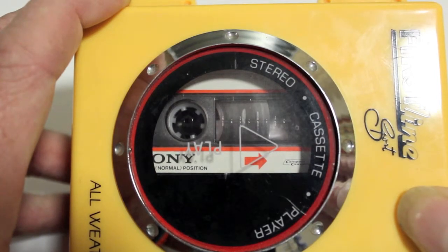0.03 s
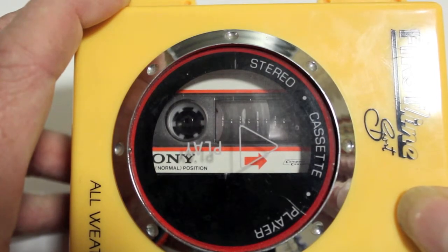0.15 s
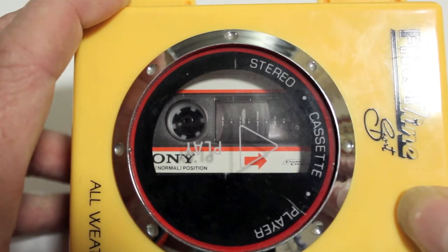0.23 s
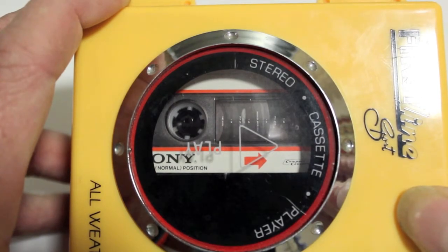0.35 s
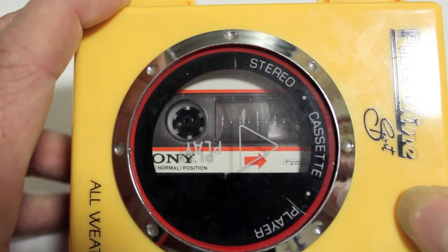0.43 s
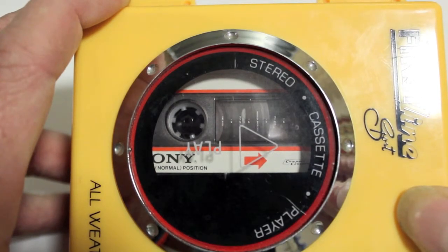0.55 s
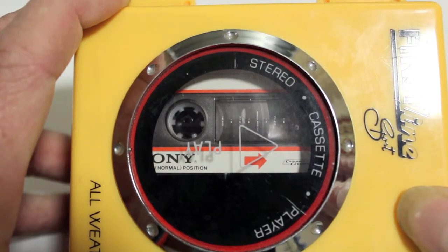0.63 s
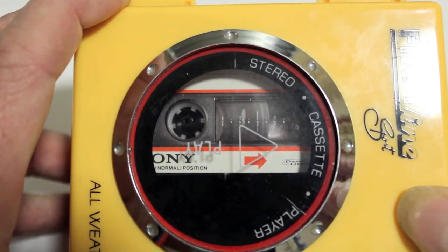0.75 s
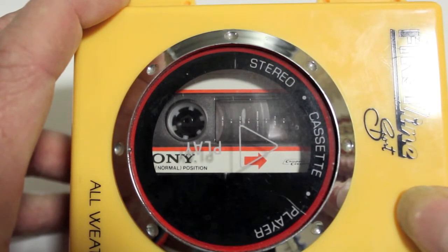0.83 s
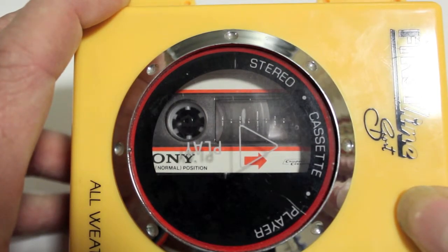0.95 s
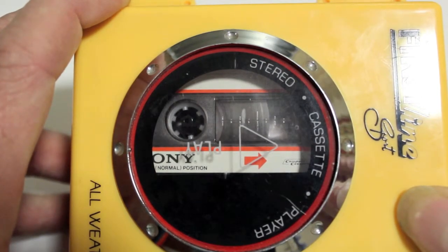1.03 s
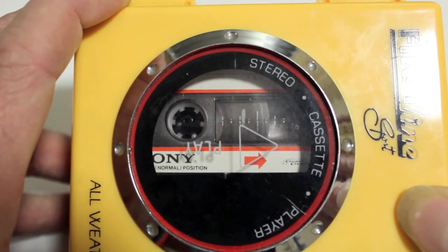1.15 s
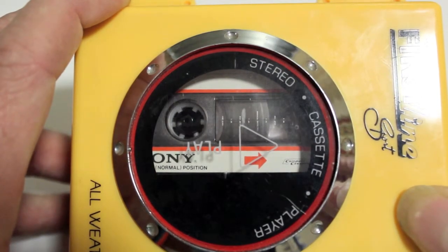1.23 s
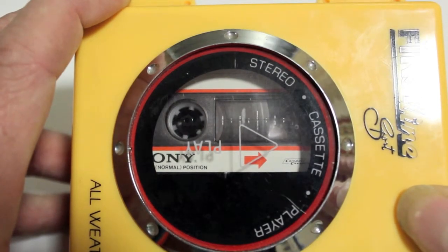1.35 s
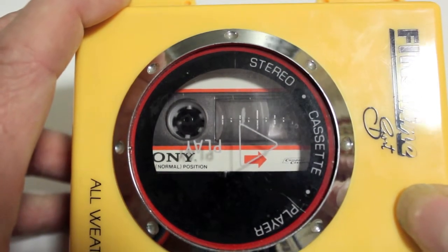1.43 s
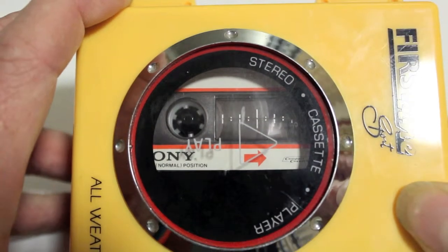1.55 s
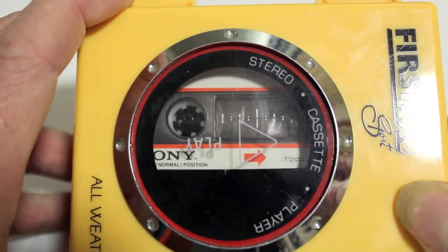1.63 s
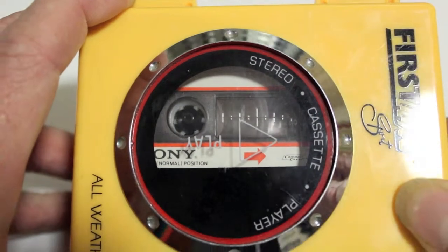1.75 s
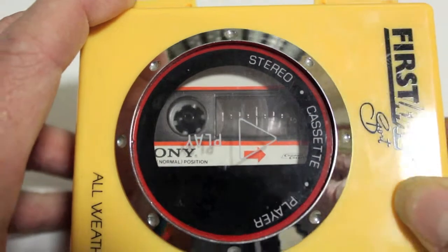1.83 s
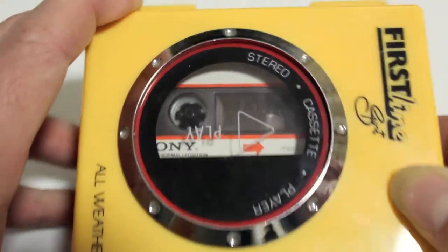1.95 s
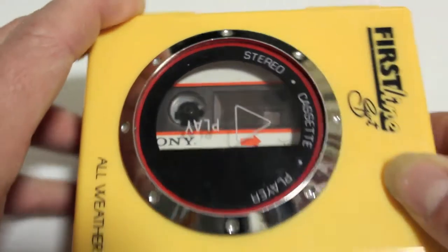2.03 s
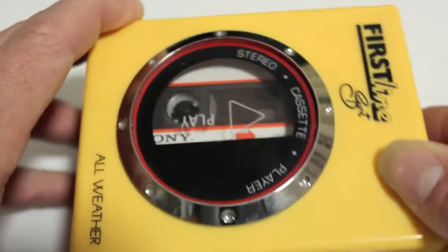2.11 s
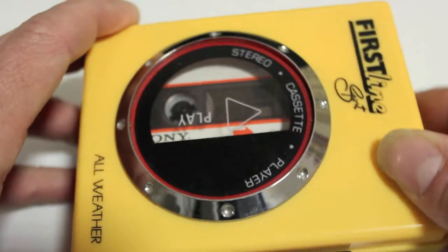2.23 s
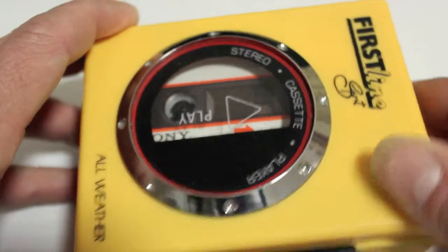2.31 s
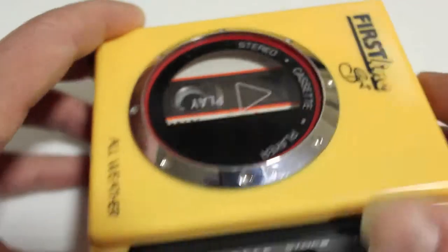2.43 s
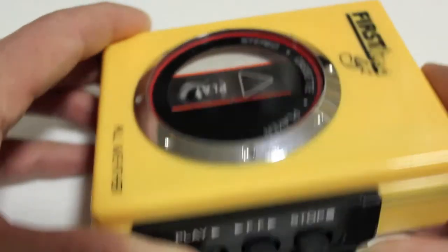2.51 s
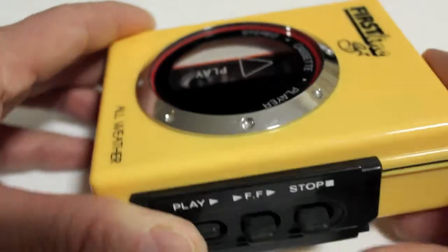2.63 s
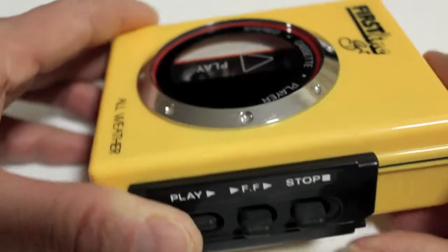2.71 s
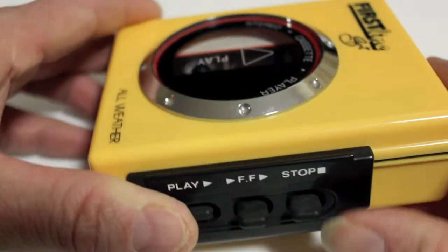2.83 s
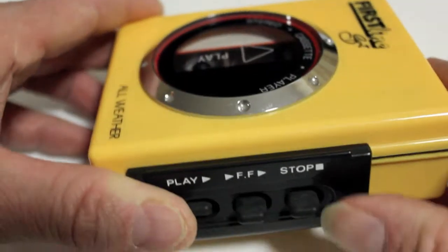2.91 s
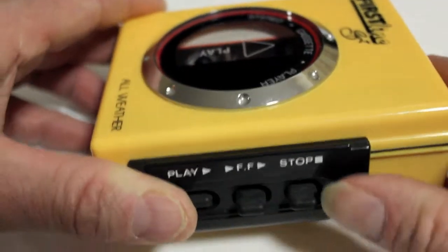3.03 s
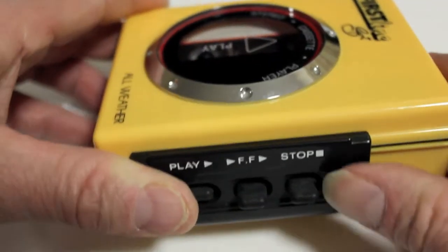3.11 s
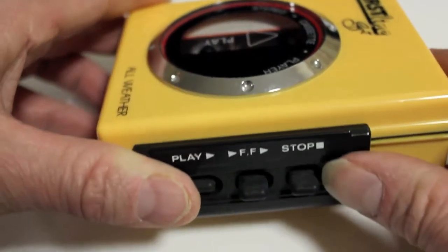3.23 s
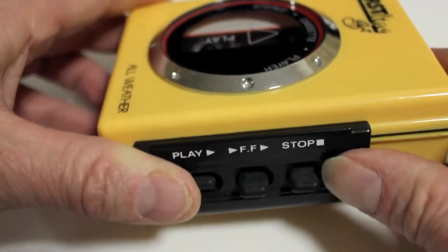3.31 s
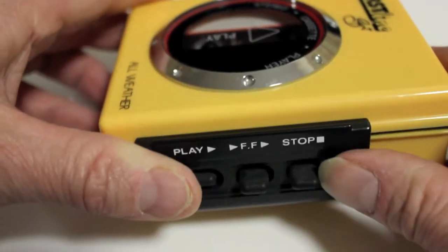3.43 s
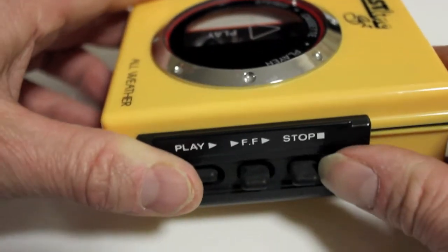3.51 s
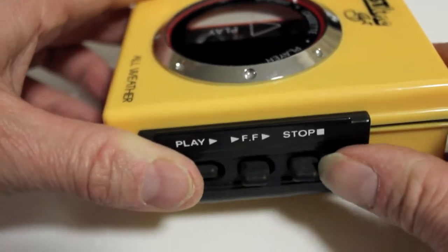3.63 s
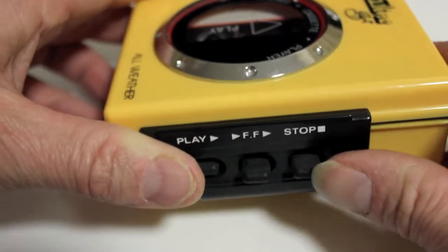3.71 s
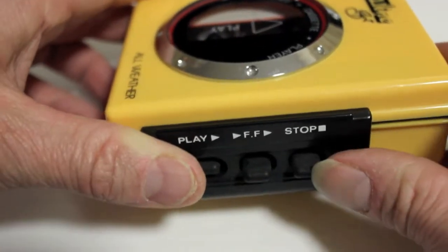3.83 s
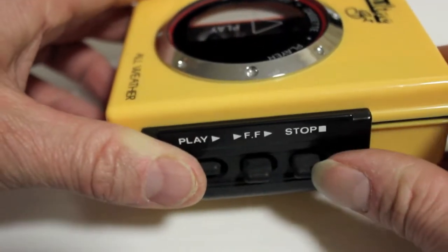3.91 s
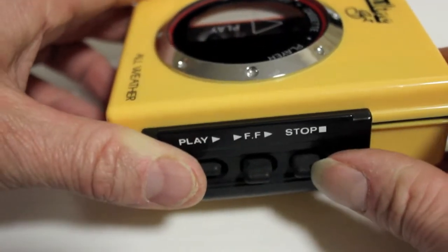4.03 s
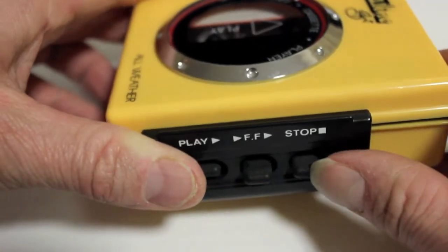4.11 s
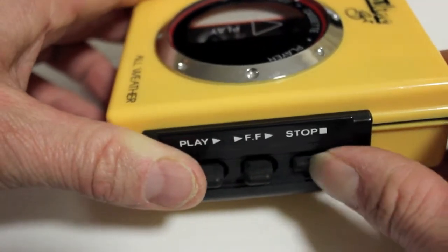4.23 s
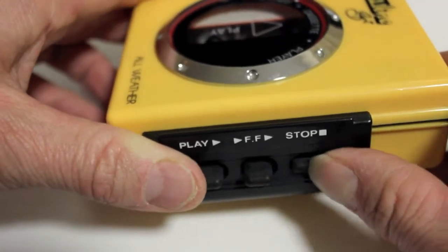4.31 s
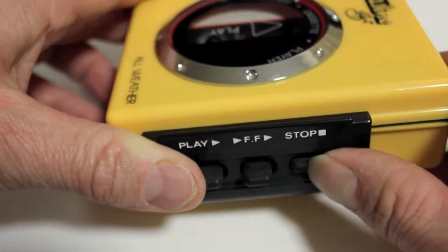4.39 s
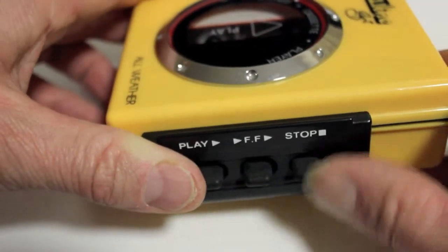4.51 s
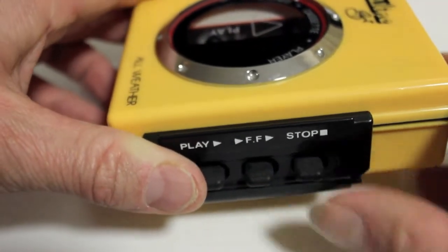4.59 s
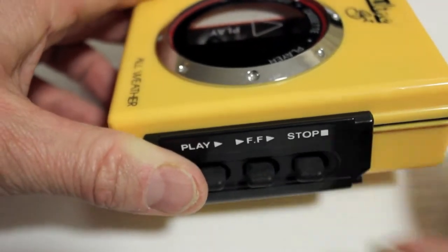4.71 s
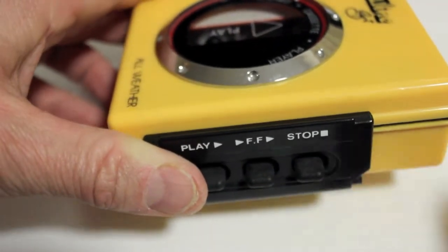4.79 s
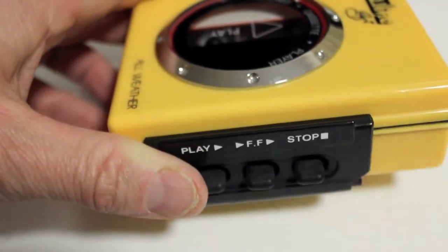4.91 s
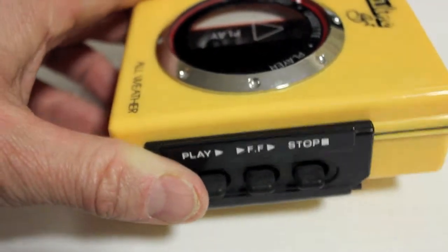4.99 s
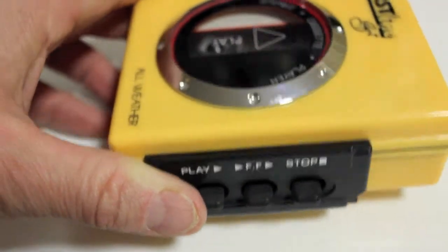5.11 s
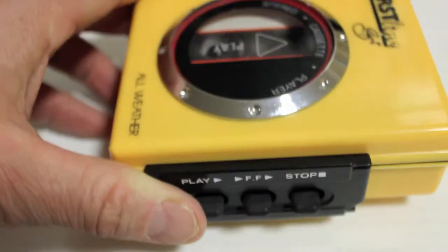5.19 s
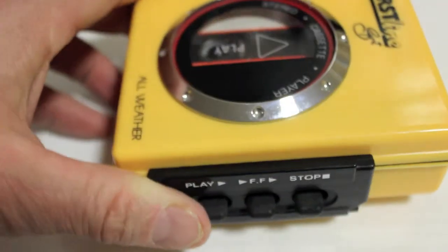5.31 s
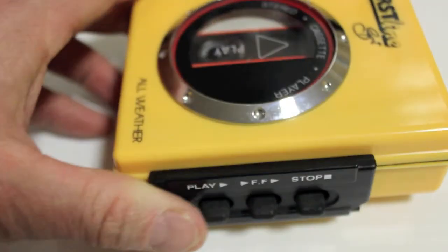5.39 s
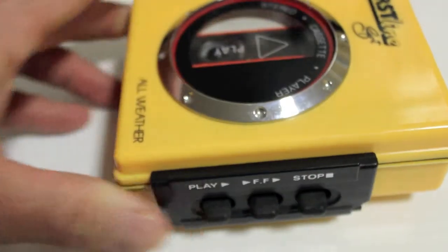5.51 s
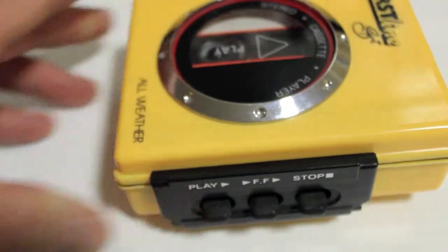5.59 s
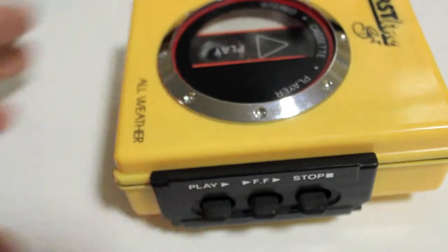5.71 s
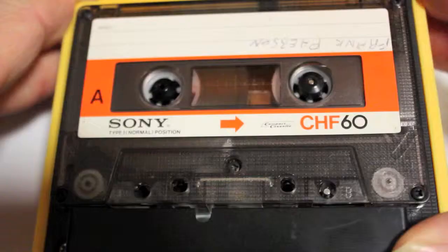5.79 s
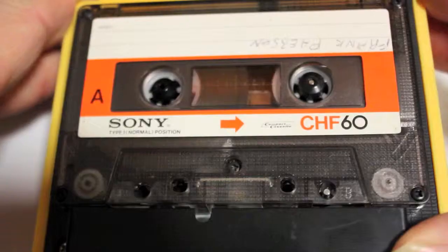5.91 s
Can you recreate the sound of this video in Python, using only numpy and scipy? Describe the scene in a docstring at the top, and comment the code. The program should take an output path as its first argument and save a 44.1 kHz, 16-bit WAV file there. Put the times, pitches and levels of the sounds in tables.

```python
"""A hand-held plastic tape player whirs faintly in a quiet room: noisy bands and thin wavering tones.
Fingers shift on the case (grainy noise through its resonances), a latch snaps and a spring rings
(decaying sines). The player turns side on, then the stop key's loud clack (noise bursts striking the
case) halts the motor. The player is set down and a hand slides away (bright noise), while the level
dips briefly. Echoes of the blows, soft room noise and low hums lie behind."""
import sys
import numpy as np
from scipy import signal
from scipy.io import wavfile
from scipy.ndimage import uniform_filter1d

SR = 44100
rng = np.random.default_rng(int(sys.argv[2]) if len(sys.argv) > 2 else 0)


def to_wav(s):
    """Save 16-bit WAV."""
    ch = np.atleast_2d(s).T  # columns
    pcm = np.round(np.clip(ch, -1, 1) * 32767)  # PCM
    wavfile.write(sys.argv[1], SR, pcm.astype(np.int16))


N = 262395
T = np.arange(N) / SR  # time in seconds

# Ways in which the plastic case rings.
# Each row: pitch in Hz, strength in dB, time to fall by 60 dB in seconds.
CASE_MODES = [(140, -1, 0.045), (272, 3, 0.063), (426, -1.5, 0.04), (526, 5.5, 0.036), (680, -1, .035),
              (767, -2.5, 0.045), (980, -3.5, 0.017), (1123, 0, 0.018), (1414, 4, 0.02), (1494, 1.5, 0.018),
              (2122, -3, 0.021), (2660, 1, 0.0055), (3860, -8, 0.0038), (5180, -22.5, 0.011)]


def gain_of(db):
    """Turns decibels into a gain."""
    return 10 ** (np.asarray(db) / 20)


def evened(x):
    """Scales a signal to an rms of 1."""
    return x / np.sqrt(np.mean(x ** 2) + 1e-20)


def read(points, hz):
    """Reads a spectrum table, with straight lines between its points on a log-frequency axis."""
    f, value = np.transpose(points)
    return np.interp(np.log(hz + 1), np.log(f + 1), value)


def add(mix, s, sound):
    """Mixes a sound in, starting at s seconds."""
    part = mix[round(s * SR):][:len(sound)]
    part += sound[:len(part)]


def favour(hz, centre_hz, octaves):
    """Bell-shaped weight around a pitch, on a log-frequency axis."""
    return np.exp(-.5 * (np.log2((hz + 1) / centre_hz) / octaves) ** 2)


def noise(shape, patchy_db):
    """Noise of rms 1: random short-time spectra weighted by shape(hz, t), with drifting patches."""
    hop, size = 256, 1024
    frames = N // hop + 5
    hz = np.fft.rfftfreq(size, 1 / SR)[:, None]
    t = np.arange(frames) * hop / SR
    real, imaginary, patches = rng.standard_normal((frames, len(hz), 3)).T
    patches = uniform_filter1d(patches, size=10, axis=0)  # smooth over pitch
    patches = evened(uniform_filter1d(patches, size=10, axis=1))  # and over time
    spectra = (real + 1j * imaginary) * gain_of(patchy_db * patches) * shape(hz, t)
    return evened(signal.istft(spectra, nperseg=size, noverlap=size - hop)[1][:N])


def rings(modes, size):
    """One decaying sine for each mode of a struck body."""
    hz, db, t60 = np.transpose(modes)[:, :, None]
    t = np.arange(size) / SR
    return gain_of(db - 60 * t / t60) * np.sin(2 * np.pi * hz * t)


def swell(t, middle, half, db):
    """Gain of one stroke: rises to db at its middle and is 12 dB lower at its ends."""
    return gain_of(db - 12.0 * np.minimum(((t - middle) / half) ** 2, 20))


def blows():
    """A short chatter of contacts cracks and drives the case modes that the struck spot reaches."""
    # Blows on the case. Each row: start in seconds, loudest short-time rms level in dB,
    # lowest and highest pitch in the blow in Hz, fading time of the contact chatter in seconds,
    # gain of the bare crack in dB, before the whole blow is brought to its level.
    blow_rows = [(1.977, -39.5, 408, 1600, 0.0012, 27), (2.1724, -27, 403, 3000, 0.00079, 23),
                 (2.180, -14, 1100, 14000, 0.0021, 23.5), (2.1807, -14, 2580, 2950, 0.00071, 3),
                 (2.1801, -17.5, 1180, 1470, 0.001, 18), (2.187, -23.5, 990, 4000, 0.0031, 21),
                 (2.488, -32.5, 220, 1420, 0.0029, 2), (2.570, -32.5, 398, 1170, 0.0093, 4),
                 (2.576, -28, 1380, 4300, 0.0044, 16.5), (2.588, -34.5, 249, 3020, 0.011, 28),
                 (2.653, -48, 3220, 3780, .002, 4), (2.655, -37.5, 200, 490, 0.0041, 5),
                 (2.724, -41, 500, 880, 0.00058, 5), (2.857, -38.5, 440, 650, 0.0011, 3),
                 (3.322, -36.5, 453, 2200, 0.0024, 24.5), (3.876, -46.5, 400, 710, 0.002, 5),
                 (4.12, -38, 400, 1200, 0.0025, 9), (4.201, -41.5, 397, 1190, 0.0011, 10),
                 (4.280, -42.5, 300, 1200, .002, 15), (4.290, -11.5, 600, 7500, 0.01, 14),
                 (4.295, -12, 1100, 5940, 0.0063, 30), (4.2985, -3, 780, 10800, 0.0019, 12),
                 (4.299, -29, 30, 110, 0.0033, 29), (4.302, -10.5, 252.5, 4000, 0.0097, 20),
                 (4.491, -39.5, 443, 800, 0.0012, 14), (4.621, -34.5, 400, 5930, 0.009, 27),
                 (4.627, -36, 3500, 8600, 0.0047, 3), (4.634, -30.5, 1200, 7700, 0.0041, 23),
                 (4.656, -36, 1170, 1700, 0.002, 31), (4.732, -46.5, 500, 1600, 0.0038, 23),
                 (4.797, -51, 1003, 1700, 0.0015, 10), (5.116, -30, 613, 1300, 0.0008, 26.5),
                 (5.14, -47, 610, 800, 0.011, 3), (5.895, -39.5, 201.4, 708, 0.0025, 3.5),
                 (5.926, -44.5, 250, 1212, 0.0035, 10), (5.944, -42, 595, 3520, 0.0053, 22)]
    out, t = np.zeros(N), np.arange(2048) / SR
    signs = (-1.) ** np.arange(len(CASE_MODES))  # neighbouring modes move in opposition
    case = signs @ rings(CASE_MODES, size=4096)
    draws = rng.standard_normal((len(blow_rows), len(t)))
    for (s, db, low_hz, high_hz, chatter, crack_db), draw in zip(blow_rows, draws):
        force = draw * np.exp(-t / chatter)
        force[0] = 2.5  # the first touch has a set strength
        reach = signal.butter(2, [low_hz, high_hz], "band", fs=SR, output="sos")
        blow = signal.fftconvolve(signal.sosfilt(reach, force), case)
        above = signal.butter(1, low_hz, "high", fs=SR, output="sos")
        below = signal.butter(2, high_hz, fs=SR, output="sos")
        crack = signal.sosfilt(np.vstack([above, below]), force)
        add(blow, 0, gain_of(crack_db) * crack)
        loudest = np.sqrt(uniform_filter1d(blow ** 2, size=128).max())
        add(out, s, gain_of(db) * blow / loudest)
    return out


def spring():
    """A flicked steel spring rings in many modes at once; close ones beat."""
    # The spring behind the keys.
    # Each row: pitch in Hz, strength in dB, time to fall by 60 dB in seconds.
    spring_modes = [(4900, -14.5, 0.27), (4950, -15, 0.18), (5040, -10.5, 0.22), (4960, -9.5, 0.41),
                    (5100, -4, 0.25), (5045, 16.5, 0.019), (7150, -8, 0.051), (8670, -15.5, .1),
                    (9000, -24, .12)]
    # Flicks of the spring. Each row: start in seconds, gain in dB.
    flicks = [(2.182, -22.5)]
    out = np.zeros(N)
    ring = rings(spring_modes, size=16384).sum(0)
    for s, db in flicks:
        add(out, s, gain_of(db) * ring)
    return out


def motor():
    """The drive makes noisy bands and wavering multiples of its shaft speed, until it is stopped."""
    # Motor and gears heard through the shell.
    # Each row: pitch in Hz, width in Hz, level in dB before the running level.
    whir_bands = [(257, 72, -69), (560, 120, -64), (794, 36, -69), (1250, 130, -66), (1480, 120, -67),
                  (1600, 76, -70), (1980, 74, -72), (2233, 630, -70.5), (2630, 1100, -73)]
    # Thin tones of the drive. Each row: multiple of the shaft speed, level in dB face on,
    # level in dB side on, both before the running level and the waver.
    whine_tones = [(6, -70.5, -68), (12, -67.5, -63.5), (18, -77, -73.5), (19, -75, -83), (24, -82, -70),
                   (28, -77.5, -71.5), (30, -73.5, -79.5), (34, -79.5, -72.5), (36, -73.5, -78.5),
                   (37, -75, -74), (38, -82, -72.5), (43, -78, -86), (45, -76.5, -82.5), (46, -70.5, -79),
                   (48, -76, -85.5), (49, -79.5, -79.5), (51, -71, -81), (52, -69.5, -69.5),
                   (53, -90, -72.5), (57, -81, -83.5)]
    shaft_hz, running_db = 43.52, 0.6
    stop_s, run_down_s = 4.292, .015  # the stop key, time to halt
    turn_s, turn_span_s, turn_db = 2.58, 0.66, 4  # turned side on, the drive swelling meanwhile

    def whir_shape(hz, t):
        power = sum(gain_of(2 * db) / width / (1 + (2 * (hz - f) / width) ** 2) ** 1.13
                    for f, width, db in whir_bands)
        return np.sqrt(power)

    whir_level = np.sqrt(sum(gain_of(2 * db) for _, _, db in whir_bands))
    draws = rng.standard_normal((1 + len(whine_tones), N))
    speed, *wavers = (evened(uniform_filter1d(draw, size=3000)) for draw in draws)
    turns = shaft_hz * np.cumsum(1 + 0.00065 * speed) / SR  # the speed wanders slightly
    side = np.clip(.5 + (T - turn_s) / turn_span_s, 0, 1)  # 0 face on, 1 side on
    whine = np.zeros(N)
    for (multiple, face_db, side_db), waver in zip(whine_tones, wavers):
        db = face_db + side * (side_db - face_db) + 2.1 * waver
        phase = 2 * np.pi * multiple * turns + waver[0]  # with a random start
        whine += gain_of(db) * np.sqrt(2) * np.sin(phase)
    level = gain_of(running_db + turn_db * np.exp(-((T - turn_s) / turn_span_s) ** 2))
    running = np.clip(1 - (T - stop_s) / run_down_s, 0, 1)
    return level * running * (whir_level * noise(whir_shape, patchy_db=2.46) + whine)


def grip():
    """Grainy friction rings the case modes; each rub favours its own part of the case."""
    # Fingers rub the case. Each row: middle in seconds, half length in seconds,
    # level at the middle in dB, favoured pitch in Hz.
    rubs = [(2.147, 0.11, -51, 606), (2.558, 0.098, -46, 960), (2.658, 0.097, -50.5, 266),
            (2.882, .09, -52, 1290), (3.21, 0.2, -52, 1030), (3.566, 0.19, -56, 1280),
            (4.5, .18, -54.5, 600), (4.742, .16, -53.5, 1205), (5.3, .2, -60, 700), (5.6, .1, -61.5, 700)]
    hold_db, hold_hz = -70, 650  # faint creep of the hands that merely hold the case

    def shape(hz, t):
        # modes that ring longer have narrower peaks
        body = sum(gain_of(db) / (1 + ((hz - f) * t60 / 5.2) ** 2) for f, db, t60 in CASE_MODES)

        def spot(centre_hz):
            power = (body * favour(hz, centre_hz, octaves=1.8)) ** 2
            return power / power.mean()

        power = gain_of(2 * hold_db) * spot(hold_hz)
        power = power + sum(swell(t, s, half, db) ** 2 * spot(f) for s, half, db, f in rubs)
        return np.sqrt(power / power.mean(0))  # colour only; the level follows below

    level = np.sqrt(gain_of(2 * hold_db) + sum(swell(T, s, half, db) ** 2 for s, half, db, _ in rubs))
    grain = gain_of(3.4 * evened(uniform_filter1d(rng.standard_normal(N), size=300)))
    return level * evened(grain * noise(shape, patchy_db=-1.0))


def slide():
    """Skin sliding over a smooth surface makes a bright, smooth swish."""
    # Slides. Each row: middle in seconds, half length in seconds, level at the middle in dB.
    slides = [(1.27, .04, -62), (2.55, 0.1, -55.5), (4.83, 0.14, -54.5), (5.275, .04, -60),
              (5.73, 0.18, -51.5)]
    # Colour of the swish. Each row: pitch in Hz, relative strength per Hz in dB.
    skin = [(1000, -23), (2500, -14), (4500, -7), (6800, -4.5), (8500, -8), (12000, -10), (15500, -6)]

    def shape(hz, t):
        return gain_of(read(skin, hz)) * (hz > 600)

    level = sum(swell(T, *row) for row in slides)
    return level * noise(shape, patchy_db=1.0)


def room(x, delay):
    """Diffuse echo: the energy of each band lingers as noise and dies at its own speed."""
    # How long the room rings. Each row: pitch in Hz, time to fall by 60 dB in seconds.
    echo_times = [(200, 0.98), (500, 0.42), (1500, 0.29), (4000, 0.39), (9000, 0.15), (15000, .14)]
    hz, t, z = signal.stft(x, SR, nperseg=256, noverlap=192)
    power = uniform_filter1d(abs(z) ** 2, size=2, axis=0)  # neighbouring bands blend
    keep = gain_of(-120 * t[1] / read(echo_times, hz))  # energy left after one frame
    held = np.array([signal.lfilter([1 - k], [1, -k], p) for k, p in zip(keep, power)])
    real, imaginary = rng.standard_normal(held.T.shape + (2,)).T
    tail_spectra = np.sqrt(held) * (real + 1j * imaginary)
    tail = signal.istft(tail_spectra, SR, nperseg=256, noverlap=192)[1]
    return np.concatenate([np.zeros(round(delay * SR)), tail])[:N]


def room_tone():
    """The quiet room: shaped noise without deep rumble, and steady low hums."""
    # Colour of the room noise. Each row: pitch in Hz, relative strength per Hz in dB.
    hiss = [(30, -27), (48, -20.5), (60, -3), (72, -3.5), (100, -6), (125, -10.5), (220, -5.5), (400, -15),
            (700, -16.5), (1500, -20.5), (3000, -21.5), (6000, -25.5), (10000, -30.5), (13500, -29),
            (16000, -29.5)]
    # Steady hums. Each row: pitch in Hz, rms level in dB.
    hums = [(70.5, -67), (100, -70.5)]

    def shape(hz, t):
        return gain_of(read(hiss, hz))

    tone = gain_of(-53.5) * noise(shape, patchy_db=1.0)
    tone = signal.sosfilt(signal.butter(4, 60., "high", fs=SR, output="sos"), tone)
    return tone + sum(gain_of(db) * np.sqrt(2) * np.sin(2 * np.pi * hz * T) for hz, db in hums)


def scene():
    """Adds up the player, the hands, the echo and the room tone."""
    knocks, ping = blows(), spring()
    # the spring faces the microphone, away from the walls, so less of it echoes
    echo = gain_of(-9.5) * room(knocks + .45 * ping, delay=.007)
    return (knocks + ping + echo + motor() + grip() + slide() + room_tone())[None]


def record(dry):
    """Gain control ducks after loud clacks, peaks clip, the level dips briefly, the top treble is cut."""
    dip_s, fade_out_s, fade_in_s, dip_db = 5.876, 0.093, 0.071, -27
    power_db = 10 * np.log10(abs(uniform_filter1d(dry[0] ** 2, size=200)) + 1e-12)
    fall = T * 52.0  # the sensed level falls by at most 52 dB a second
    sensed_db = np.maximum.accumulate(power_db + fall) - fall
    over_db = np.maximum(sensed_db + 14.0, 0)  # amount above -14 dB
    late_db = signal.lfilter(np.ones(400) / 400, 1, over_db)  # the control lags the attack
    clipped = np.clip(dry / gain_of(0.46 * late_db), -.99, .99)
    fades = np.maximum((dip_s - T) / fade_out_s, (T - dip_s) / fade_in_s)  # out and straight back in
    heard = clipped * np.clip(fades, gain_of(dip_db), 1)
    treble_cut = signal.firwin(511, 15800, window=("kaiser", 9), fs=SR)  # edge in Hz
    return signal.oaconvolve(heard, treble_cut[None], "same")


dry = scene()
out = record(dry)
to_wav(out)
```